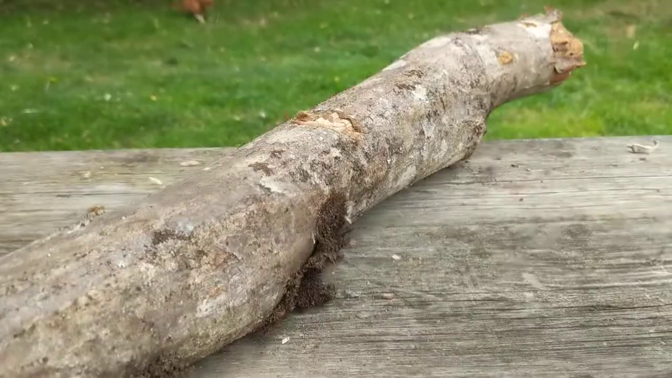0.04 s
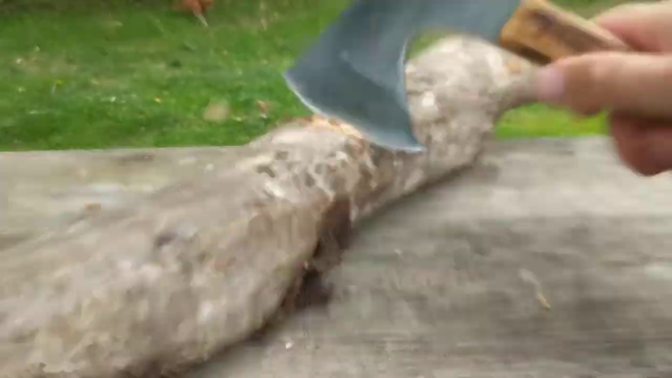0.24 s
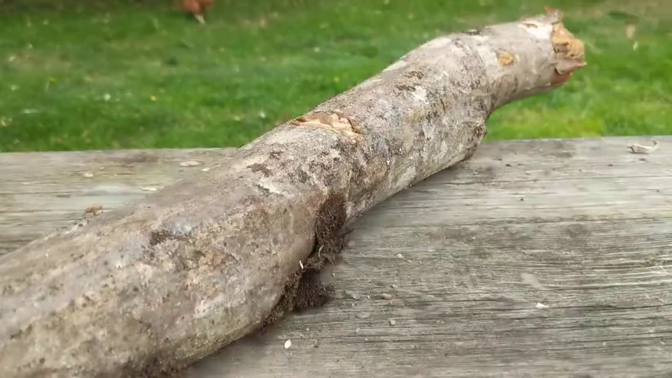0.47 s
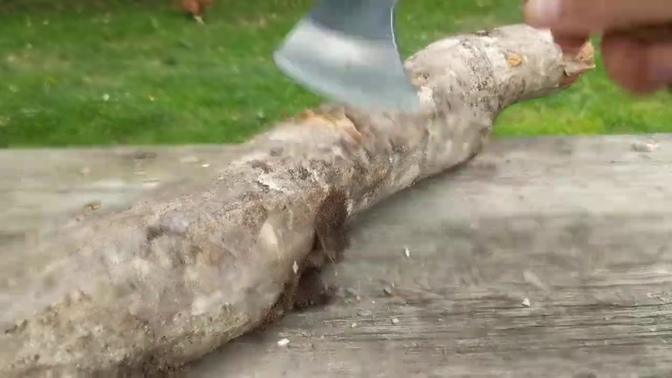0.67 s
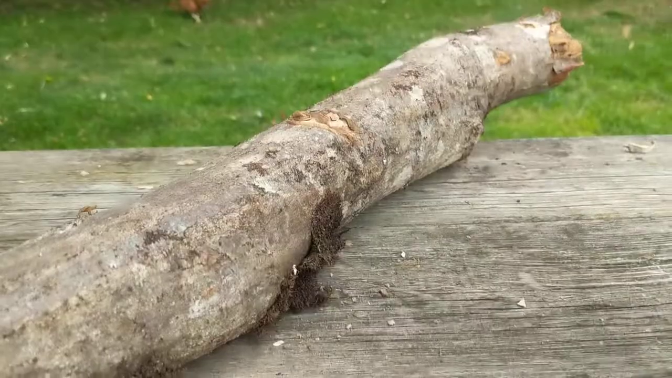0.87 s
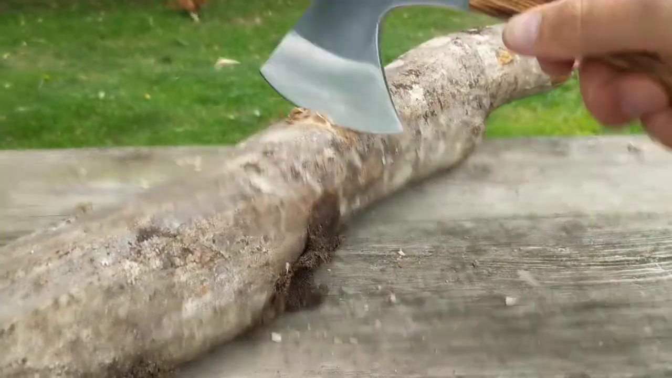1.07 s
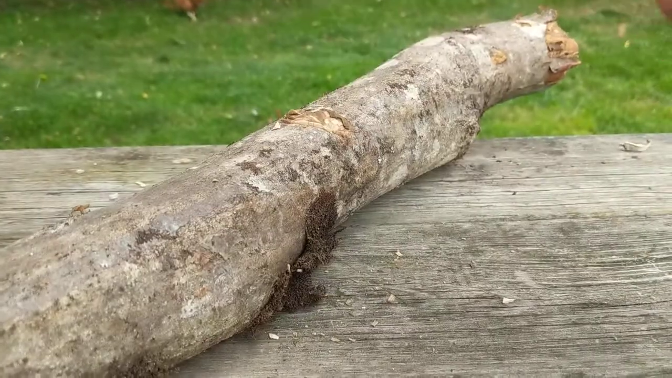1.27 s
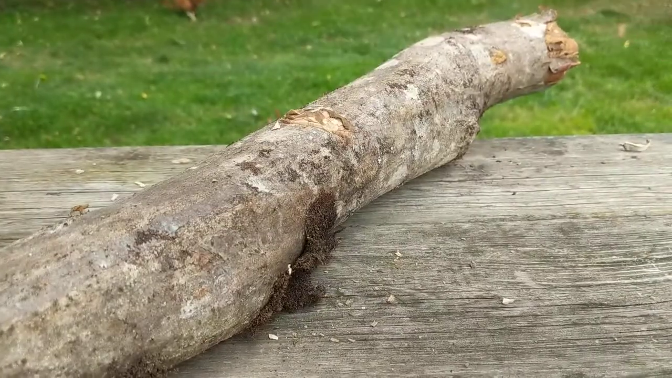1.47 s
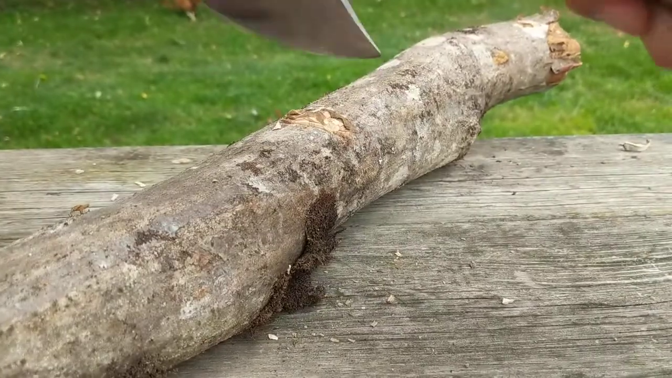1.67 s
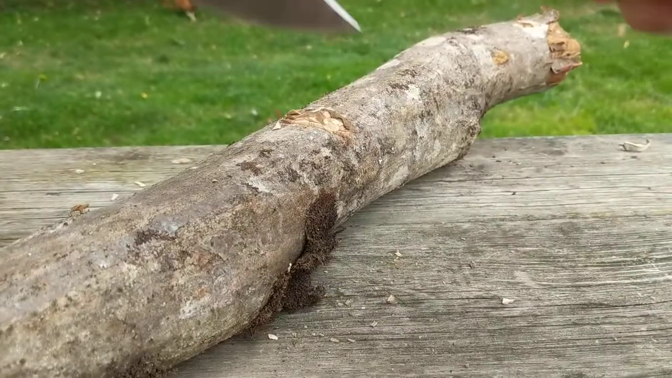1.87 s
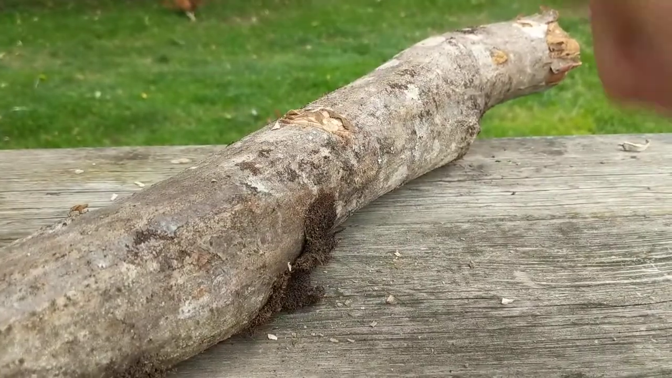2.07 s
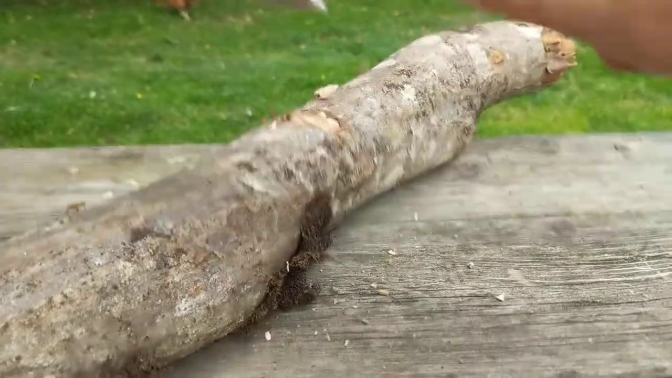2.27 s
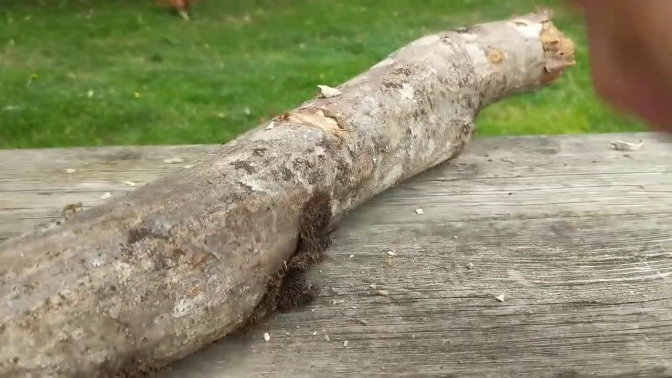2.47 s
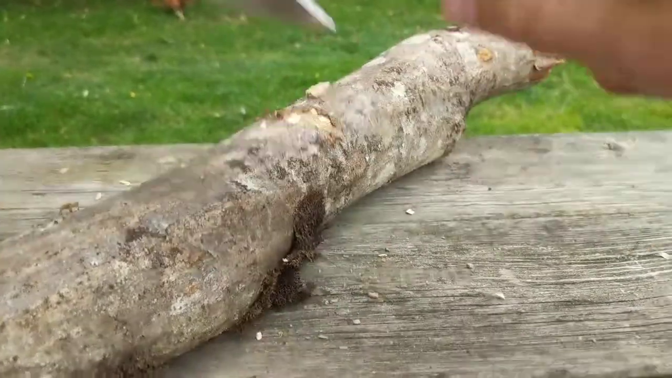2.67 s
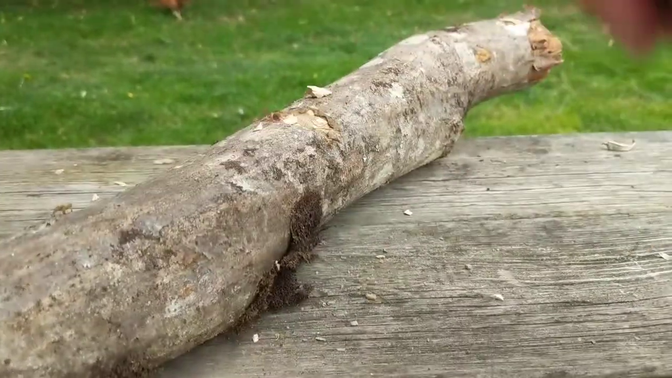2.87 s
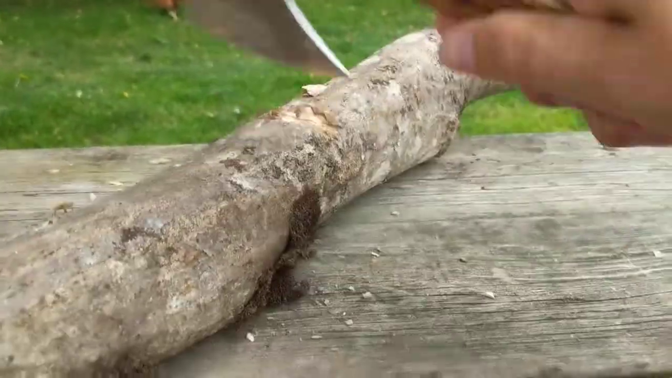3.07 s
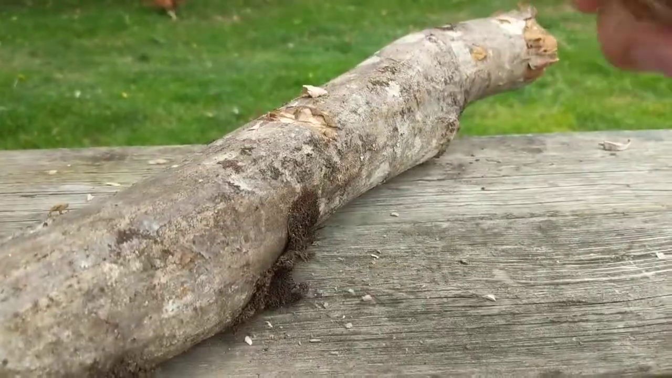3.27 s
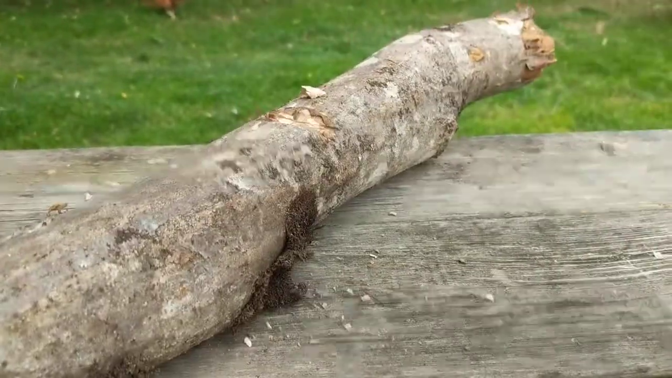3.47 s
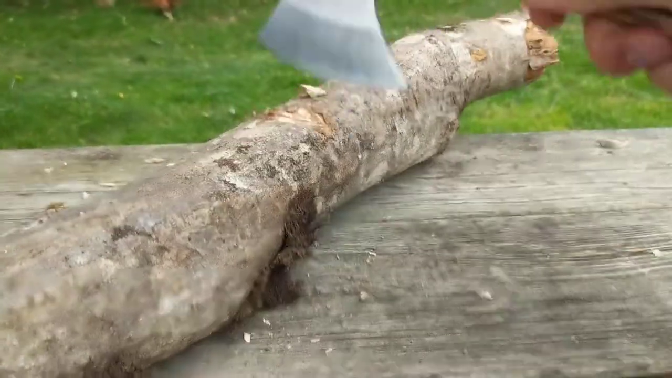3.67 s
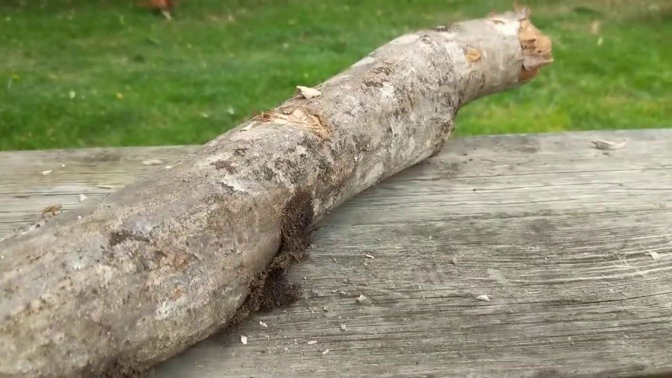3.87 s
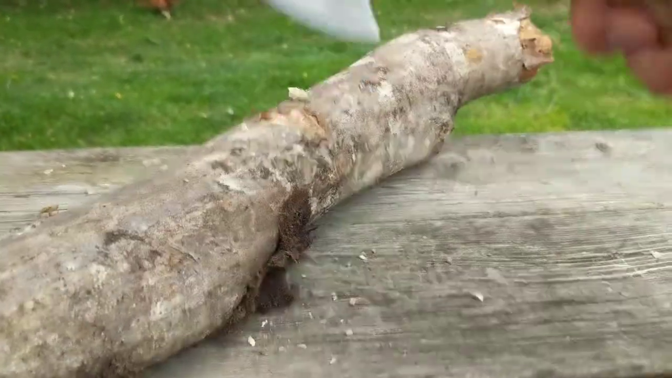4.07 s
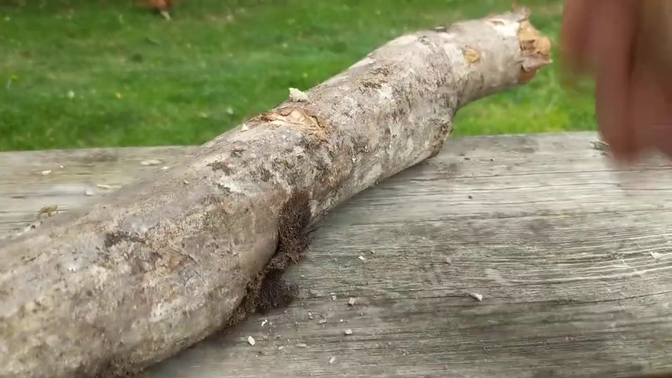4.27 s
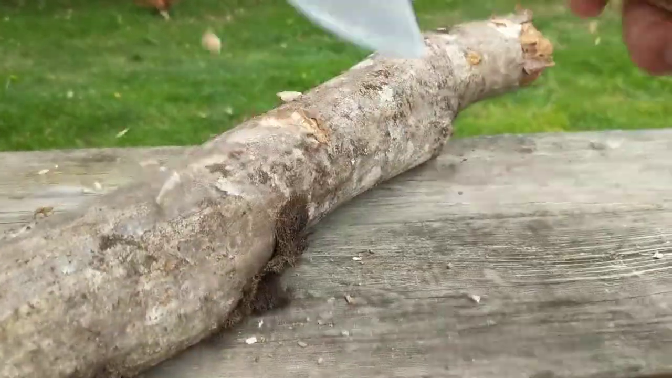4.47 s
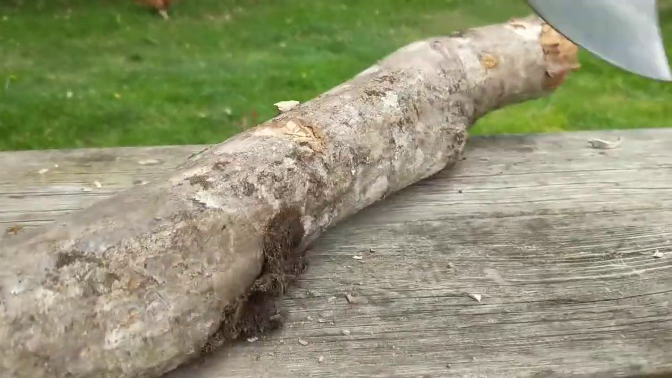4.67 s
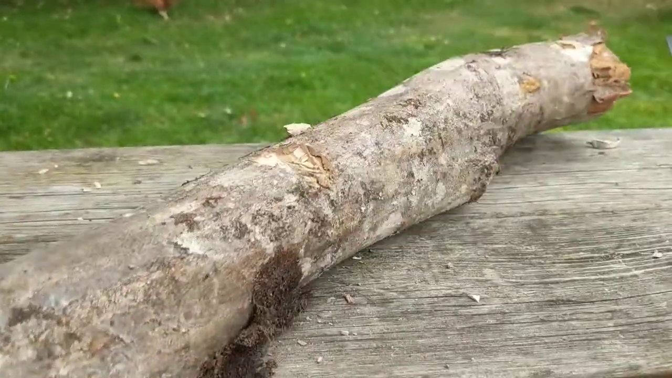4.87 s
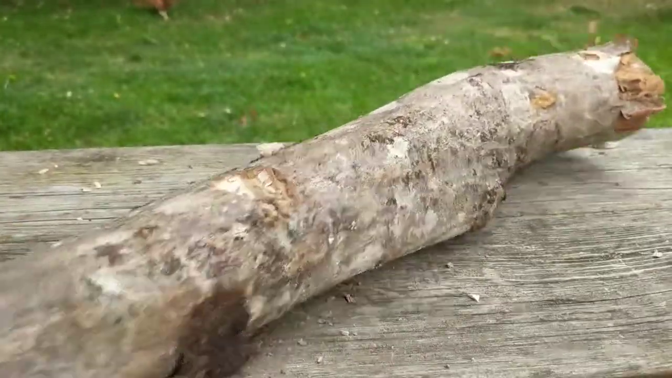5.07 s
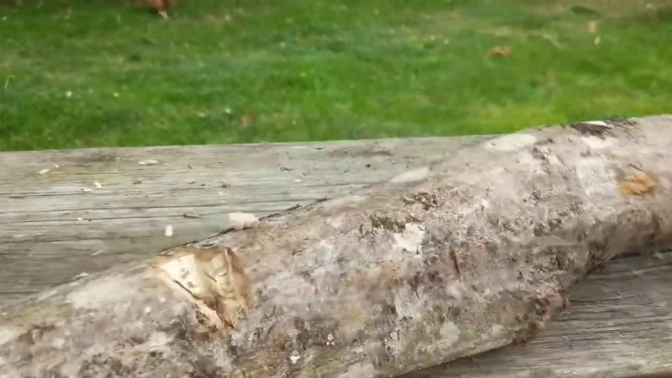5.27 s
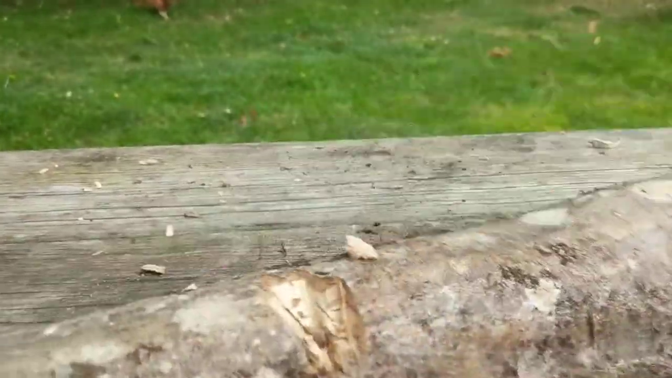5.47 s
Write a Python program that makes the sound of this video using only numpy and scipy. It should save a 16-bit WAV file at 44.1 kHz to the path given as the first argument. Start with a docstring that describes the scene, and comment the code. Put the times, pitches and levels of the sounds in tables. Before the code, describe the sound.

Close by in a quiet yard, a hatchet strikes a dry branch on a bench: three quick blows, a pause, three more, a pause, then three more. Each is a sharp woody crack with a short, hollow plank thump, followed by a very faint blade rasp. Tiny chips tick down between blows. At the end, the hand-held microphone picks up low rumble, rubbing and two knocks.

```python
"""On a wooden garden bench a dry branch is chopped with a hatchet, in runs of three or four blows, close by.
Each blow cracks fibres (shaped noise) and excites decaying modes of branch, notch and planks; the blade
then rasps and rings as it leaves the cut. Chips tick down as short noise bursts and soft low bumps sound.
Fingers knock on the hand-held camera and, at the end, rub and rumble on it, over quiet outdoor air."""
import sys
import numpy as np
from scipy import signal
from scipy.fft import rfft, irfft, next_fast_len
from scipy.io import wavfile
from scipy.ndimage import uniform_filter1d, map_coordinates

SR = 44100
rng = np.random.default_rng(int(sys.argv[2]) if len(sys.argv) > 2 else 0)


def pcm_store(signal):
    """Save signal as 16-bit PCM."""
    levels = np.round(np.clip(np.atleast_2d(signal), -1, 1) * 32767)
    wavfile.write(sys.argv[1], SR, levels.astype(np.int16).T)


N = 243873

# Blows, the first already dying away: [t/s, strength level/dB, relative levels of branch ring/dB,
# notch snap/dB and crack/dB, nominal notch f/Hz, time stuck in the cut/s, pull level/dB]
BLOWS = [(-.11, -8.5, 16, 0, 0, 3060, 0.077, -41), (0.2698, -8.5, 2.5, 1, -3.5, 3050, 0.063, -45),
         (0.6504, -8.5, 3.5, 5, 2, 4410, 0.067, -43.5), (1.0315, -9.5, 7, 0.5, -1.5, 4900, 0.059, -44.5),
         (2.1862, -10, 2.5, 0, -1, 5300, .067, -43.5), (2.5917, -10, 1, 2.5, 1.5, 3090, .062, -47.5),
         (3.0067, -10, -1.5, -2, 0, 3040, 0.06, -48), (3.6485, -8.5, -5, -4.5, 2, 2050, 0.057, -42.5),
         (4.024, -9, -4, -8, 3, 4246, 0.071, -43.5), (4.3755, -8.5, 1.5, -1.5, -3.5, 3070, 0.076, -43.5)]
# Modes of the branch on the bench planks: [nominal f/Hz, relative level/dB, free t60/s]
BENCH_MODES = [(53.45, -24, 0.36), (62.8, -21.5, 0.37), (91, -31, 0.56), (116.4, -24.5, 0.33),
               (120, -32.5, 0.12), (160.3, -13.5, 0.077), (171, -27, 0.29), (206.2, -19.5, 0.16),
               (233, -16, 0.11), (269.5, -22.5, 0.165), (309.6, -26, 0.2), (461.3, -23, 0.154),
               (519, -10.5, 0.049), (588.1, -17, 0.11), (663, -23.5, 0.101), (765, -13, 0.077),
               (799, -25, 0.104), (860, -12.5, 0.036), (935, -43, 0.2), (996.3, -11.5, 0.039),
               (1122, -35, 0.12)]
# Heavily damped bending of the branch under the blade: [nominal f/Hz, relative level/dB, free t60/s]
FLEX_MODES = [(116.4, -10, 0.079), (316.1, -4, 0.014), (937, -12, 0.06)]
# Spectrum of the many small modes of bark and grain: [f/Hz, relative level/dB]
GRAIN_SPECTRUM = [(200, -10.5), (350, 1.5), (600, -0.5), (1000, 0.5), (1800, -2), (2600, -14),
                  (5000, -23.5), (9000, -24.5), (12000, -51)]


def amp(db):
    """The level law: amplitude ratio = 10^(dB/20)."""
    return np.exp(np.asarray(db) * (np.log(10) / 20))


def unit(x, size=None):
    """Normalisation to an rms of 1 over the first size samples, or over all."""
    return x / np.sqrt(np.mean(x[:size] ** 2) + 1e-20)


def along(points, hz):
    """Linear interpolation of (f, value) points on a logarithmic frequency axis."""
    point_hz, value = np.transpose(points)
    return np.interp(np.log(hz + 1), np.log(point_hz), value)


def add(track, s, sound):
    """Superposition: the sound is summed into the track from time s, in seconds."""
    start = round(s * SR)
    sound, start = sound[max(-start, 0):], max(start, 0)
    track[start:start + len(sound)] += sound[:len(track) - start]


def wobble(rate):
    """A band-limited random process: a spline through random knots, rate knots a second."""
    knots = rng.standard_normal(int(N * rate / SR) + 4)
    return map_coordinates(knots, [np.arange(N) * rate / SR])


def colour(x, spectrum):
    """Minimum-phase filtering: a folded cepstrum gives a causal response with the (f, dB) gain."""
    size = 2 * next_fast_len(len(x) // 2 + 2048)
    gain = amp(along(spectrum, np.fft.rfftfreq(size, 1 / SR)))
    cepstrum = irfft(np.log(gain), size)
    # fold the anti-causal half onto the causal half
    cepstrum[1:size // 2] *= 2
    cepstrum[size // 2 + 1:] = 0
    response = np.exp(rfft(cepstrum))
    return irfft(rfft(x, size) * response, size)[:len(x)]


def noise(spectrum):
    """Stationary random noise: white noise shaped to the spectrum, with an rms of 1."""
    return unit(colour(rng.standard_normal(N), spectrum))


def patchy(x, depth_db):
    """Time-varying filtering: a smoothed random gain field over frequency and time shifts the colour."""
    spectrogram = signal.stft(x, nperseg=512)[2]
    field = rng.standard_normal(spectrogram.shape)
    field = uniform_filter1d(field, size=6, axis=0)
    field = uniform_filter1d(field, size=14, axis=1)
    return unit(signal.istft(spectrogram * amp(depth_db * unit(field)), nperseg=512)[1][:N])


def soften(x, hz):
    """Contact compliance: a soft contact acts as a second-order low-pass."""
    return signal.sosfilt(signal.butter(2, min(hz, SR / 3), fs=SR, output="sos"), x)


def ring(modes, t, scatter_db, detune):
    """Modal excitation: one decaying sine a row; each contact draws new strengths and pitches."""
    hz, db, t60 = np.transpose(modes)[:, :, None]
    size, shift = rng.standard_normal((2, len(modes), 1))
    sign = (-1) ** np.arange(len(modes))[:, None]
    decay = amp(db + scatter_db * size - 60 * t / t60)
    return sign * decay * np.sin(2 * np.pi * hz * (1 + detune * shift) * t)


def splinter(t, cut_s, tail_db, tail_t60):
    """Fracture noise: fibres snap densely while the edge goes in, then ever more faintly."""
    bite = np.exp(-(2 * t / max(cut_s, 1e-4) - 1) ** 4)
    tail = amp(tail_db - 60 * t / tail_t60)
    return rng.standard_normal(len(t)) * (bite + tail)


def plank_thump(t, ring_db):
    """Forced modal response: the stopped head drives planks, frame and branch bending."""
    # Modes of the bench's frame, shaken through the planks: [nominal f/Hz, relative level/dB, free t60/s]
    frame_modes = [(362, -28, 0.15), (411, -27.5, 0.11)]
    # How hard a blow drives the planks: [f/Hz, relative level/dB]
    drive_spectrum = [(60, -2), (150, -1.5), (250, -.5), (400, -1.5), (600, 0.5), (950, 0)]
    # A blow beside the support rings the branch more and shifts the thump: [f/Hz, dB per dB of ring]
    thump_per_ring = [(100, -.1), (220, -.2), (400, -.45), (560, -.25), (800, .2)]

    mode_hz = np.vstack([BENCH_MODES, FLEX_MODES, frame_modes])[:, :1]
    drive = amp(along(drive_spectrum, mode_hz) + ring_db * along(thump_per_ring, mode_hz))
    modes = np.vstack([ring(BENCH_MODES, t, scatter_db=2.0, detune=0.0071),
                       ring(FLEX_MODES, t, scatter_db=2.5, detune=0.031),
                       ring(frame_modes, t, scatter_db=1.5, detune=0.024)])
    # the wedged blade damps the higher modes of the wood
    modes = modes * amp(-55 * t * mode_hz / mode_hz.max())
    return amp(8.5) * soften((drive * modes).sum(0), hz=2090)


def branch_ring(t, ring_db):
    """Free vibration of the branch: a few short modes over a dense, noise-like rattle."""
    # The branch's own short resonances: [nominal f/Hz, relative level/dB, t60/s]
    branch_modes = [(1317.6, -7, 0.024), (1577, -1.5, 0.026), (1782, -.5, 0.034), (2060, -6, .018)]

    branch = unit(ring(branch_modes, t, scatter_db=4.0, detune=0.012).sum(0), size=1024)
    # countless small modes of bark and grain blur into a short rattle
    rattle = rng.standard_normal(len(t)) * amp(-60 * t / 0.075)
    rattle = unit(colour(rattle, GRAIN_SPECTRUM), size=1024)
    return amp(ring_db - 21.5) * branch + amp(ring_db - 19.5) * rattle


def notch_snap(t, snap_db, notch_hz):
    """Local resonance: the wood around the cut rings briefly, one pitch shifting from blow to blow."""
    # The wood around the cut: [nominal f/Hz, relative level/dB, t60/s]
    notch_modes = [(2580, -8.5, 0.0078), (3055, 2, 0.013), (3990, -11, 0.015), (4690, -8, 0.022),
                   (5240, -10.5, 0.016)]

    # the notch pitch of this blow joins the fixed modes
    modes = list(notch_modes) + [(notch_hz, -3, .016)]
    snap = ring(modes, t, scatter_db=1.5, detune=0.0098).sum(0)
    return amp(snap_db - 19.5) * unit(snap, size=1024)


def chops():
    """Impact: the edge cracks into the wood; the stopped head then drives branch and planks."""
    # Spectrum of the snapping fibres: [f/Hz, relative level/dB]
    crack_spectrum = [(1000, -5), (2500, -1.5), (5500, -4.5), (6600, -1.5), (7700, 0), (9200, -1),
                      (10200, -10.5), (11500, -21.5), (16000, -22)]

    out, t = np.zeros(N), np.arange(SR // 2) / SR
    for s, db, ring_db, snap_db, crack_db, notch_hz, *_ in BLOWS:
        # time in s for the edge to go in: a louder crack is a quicker cut
        cut_s = .0021 * np.exp(-.07 * crack_db)
        fibres = splinter(t, cut_s, tail_db=-12.5, tail_t60=0.035)
        crack = amp(crack_db - 21) * unit(colour(fibres, crack_spectrum), size=1024)
        # bark crumbles just before the edge meets hard wood
        bark = colour(splinter(t, cut_s, tail_db=-20.5, tail_t60=.01), GRAIN_SPECTRUM)
        wood = plank_thump(t, ring_db) + branch_ring(t, ring_db) + notch_snap(t, snap_db, notch_hz)
        add(out, s - .002, amp(db - 23) * bark)
        add(out, s + .0003, amp(db) * crack)
        add(out, s + .0009, amp(db) * wood)
    return out


def drag(length):
    """Friction: unevenly slipping noise along the cut, with the modes of the steel head."""
    # The steel head: [nominal f/Hz, relative level/dB, t60/s]
    steel_modes = [(2720, -7, .15), (3870, -8, .22), (4450, -6, .28), (4720, -7, .2), (5850, -5, .28),
                   (7450, -4, .28), (7870, -7, .22), (8330, 0, .22), (9250, -7, .2)]
    # Spectrum of the rasp: [f/Hz, relative level/dB]
    rasp_spectrum = [(200, 6.5), (900, 7.5), (1800, 1.5), (2500, 0), (4700, -0.5), (6800, -4), (8700, 1.5),
                     (9600, -10.5), (11000, -18), (16000, -26)]

    t = np.arange(SR // 5) / SR
    stroke = (1 - np.exp(-t / .0015)) * np.exp(-(t / max(length, 1e-3)) ** 2)
    slips = amp(5.8 * unit(uniform_filter1d(rng.standard_normal(len(t)), size=200)))
    rasp = unit(colour(rng.standard_normal(len(t)) * stroke * slips, rasp_spectrum), size=2048)
    head = ring(steel_modes, t, scatter_db=3.5, detune=.0008).sum(0)
    steel = unit(head * (1 - np.exp(-t / 0.002)), size=2048)
    return amp(-12.8) * rasp + amp(-22) * steel


def creak():
    """Intermittent fracture: fibres give way in uneven jerks as the blade prises the cut open."""
    t = np.arange(SR // 5) / SR
    jerks = amp(7.3 * unit(uniform_filter1d(rng.standard_normal(len(t)), size=150)))
    stroke = (1 - np.exp(-t / 0.0013)) * np.exp(-(t / .045) ** 2)
    return unit(colour(rng.standard_normal(len(t)) * jerks * stroke, GRAIN_SPECTRUM), size=2048)


def blade():
    """Sliding friction: after every blow the blade wedges in, sticks, is levered loose and slides out."""
    # delay after the blow, length of the stroke, level next to the blow
    wedge_after_s, wedge_s, wedge_db = .014, .055, -37.5
    # the blade comes free in two drags; the slide is delayed from the levering
    lever_s, slide_after_s, slide_s = 0.037, .04, 0.044
    creak_db = -10.5  # next to the pull
    out = np.zeros(N)
    for blow, (s, db, *_, stuck_s, pull_db) in enumerate(BLOWS):
        add(out, s + wedge_after_s, amp(db + wedge_db) * drag(wedge_s))
        levering = drag(lever_s) + amp(creak_db) * creak()
        add(out, s + stuck_s, amp(pull_db) * levering)
        # the slide, next to the levering, grows by 1 dB a blow as the cut deepens
        slide_db = pull_db - 8.5 + blow
        add(out, s + stuck_s + slide_after_s, amp(slide_db) * drag(slide_s))
    return out


def ticks(rows):
    """Light impact: noise bursts, bright tick plus duller body, for rows of (s, level dB, body dB)."""
    # Spectrum of the bright part: [f/Hz, relative level/dB]
    tick_spectrum = [(1000, -25.5), (5000, -8), (7000, -3.5), (8700, 3), (10000, -18), (12000, -23),
                     (16000, -30)]

    out, t = np.zeros(N), np.arange(SR // 16) / SR
    for s, db, body_db in rows:
        tick, body = rng.standard_normal((2, len(t))) * amp(-60 * t / 0.034)
        tick = unit(colour(tick, tick_spectrum), size=256)
        body = unit(soften(body, hz=3674), size=256)
        add(out, s + 0.0011, amp(db - 16.0) * (tick + amp(body_db) * body))
    return out


def chips():
    """Delayed light impacts: large flakes of bark land, and a crumb falls after every blow's flight time."""
    # The larger chips landing: [t/s, nominal tick level/dB, body level next to the tick/dB]
    large_chips = [(0.847, -47.5, -24.5), (1.267, -54, -4), (1.3598, -41.5, -20), (1.5379, -48.5, -20),
                   (1.723, -50.5, -6.5), (2.5232, -52.5, 7.5)]

    crumbs = []
    for s, *_ in BLOWS:
        flight_s = rng.uniform(.19, .3)
        crumbs.append((s + flight_s, -60 + 5.5 * rng.standard_normal(), 2))
    return ticks(list(large_chips) + crumbs)


def bumps():
    """Soft impact: the holding hand shifts, or the branch drops back after a pull, and the planks sound."""
    # Soft low bumps, most just before a blow, as the downswing shifts the holding hand:
    # [t/s, peak level/dB, contact softness f/Hz]
    hand_shifts = [(2.486, -44, 340), (2.898, -48.5, 254), (3.371, -40.5, 230), (3.539, -47, 297),
                   (4.316, -51, 300)]

    out, t = np.zeros(N), np.arange(SR // 4) / SR
    # the branch, lifted by the blade, drops back about 66 ms after the levering
    settling = [(s + stuck_s + .066 + .014 * rng.standard_normal(), -44, 380)
                for s, *_, stuck_s, _ in BLOWS]
    for s, db, soft_hz in list(hand_shifts) + settling:
        modes = np.vstack([ring(BENCH_MODES, t, scatter_db=3.5, detune=0.019),
                           ring(FLEX_MODES, t, scatter_db=1.5, detune=0.033)])
        bump = soften(modes.sum(0), soft_hz)
        add(out, s, amp(db) * bump / np.abs(bump).max())
    return out


def taps():
    """Damped shell modes: fingers knock on the camera's case and damp its ringing."""
    # Knocks: [t/s, peak level/dB, contact softness f/Hz, added finger damping t60/s]
    knocks = [(0.19, -43, 2500, 0.021), (5.322, -26, 420, 0.43), (5.389, -21, 2400, .4)]
    # The case: [nominal f/Hz, relative level/dB, t60 without the finger/s]
    case_modes = [(142, 5.5, .08), (318, -3.5, 0.11), (446, -1, 0.16), (526, -3, 0.1), (725, -6.5, 0.085),
                  (926, -3, 0.087), (1085, -8, 0.07), (1660, -10.5, 0.062), (2430, -18, .05)]

    out, t = np.zeros(N), np.arange(SR // 4) / SR
    for s, db, soft_hz, t60 in knocks:
        contact = rng.standard_normal(len(t)) * amp(-2.5 - 60 * t / 0.077)
        case = ring(case_modes, t, scatter_db=4.5, detune=0.0093).sum(0)
        tap = soften((case + contact) * amp(-60 * t / t60), soft_hz)
        add(out, s, amp(db) * tap / np.abs(tap).max())
    return out


def handling():
    """Modulated friction noise: fingers shift on the camera, a lumpy rumble under rubbing skin."""
    # The hand on the camera: [t/s, relative rumble level/dB, relative sliding hiss level/dB]
    hand_levels = [(4.6, -56, -68.5), (4.658, -59.5, -85), (4.7, -45, -62), (4.754, -35, -60.5),
                   (4.864, -45, -57), (5.014, -50.5, -68.5), (5.15, -31.5, -64.5), (5.314, -29.5, -59),
                   (5.36, -32, -63), (5.53, -42, -61.5)]
    # Spectrum of the finger pressure: [f/Hz, relative level/dB]
    rumble_spectrum = [(25, -33.5), (45, -7), (65, 1), (110, -1.5), (170, -9.5), (280, -16.5), (400, -26.5),
                       (900, -63), (3000, -88.5)]
    # Spectrum of the rubbing skin: [f/Hz, relative level/dB]
    rub_spectrum = [(250, -12), (400, 8.5), (540, 17.5), (680, 5), (1000, 2.5), (1500, 0), (3000, -3.5),
                    (6000, -7.5), (7500, -15), (11000, -34.5)]
    # Spectrum of the sliding hiss: [f/Hz, relative level/dB]
    hiss_spectrum = [(5000, -20.5), (7300, -7), (8400, 0), (9200, -4), (10200, -13.5), (11500, -23.5),
                     (16000, -32)]
    # The grip slips with a small click: [t/s, nominal tick level/dB, body level next to the tick/dB]
    grip_clicks = [(0.191, -47.5, 4), (4.6922, -41.5, 5), (4.9482, -39, -15)]

    t = np.arange(N) / SR
    s, *levels = np.transpose(hand_levels)
    rumble_db, hiss_db = [np.interp(t, s, db, left=-120) for db in levels]
    # rubbing grows with both the pressure (rumble) and the sliding (hiss)
    pressure_share = .22
    rub_db = 2.5 + pressure_share * rumble_db + (1 - pressure_share) * hiss_db
    # the pressure of the fingers comes in lumps, from 45 random knots a second
    rumble = unit(amp(1.5 * wobble(45)) * noise(rumble_spectrum))
    grip = unit(amp(1.2 * wobble(50) + 3 * wobble(700)))
    skin = patchy(noise(rub_spectrum), depth_db=2.5)
    hiss = patchy(noise(hiss_spectrum), depth_db=1.5)
    sliding = grip * (amp(rub_db) * skin + amp(hiss_db + 0.55) * hiss)
    return amp(rumble_db + 0.2) * rumble + sliding + ticks(grip_clicks)


def yard(x):
    """Diffuse reverberation: convolution with a noise tail whose decay depends on frequency."""
    # The yard's decay: [f/Hz, t60/s]
    yard_decay = [(60, 0.4458), (130, 0.85), (300, 0.2255), (1000, 0.445), (3000, 0.38), (9000, 0.0028)]
    # The yard's colour: [f/Hz, relative level/dB]
    yard_spectrum = [(60, 4.5), (130, -1.5), (300, -3.5), (1000, -4), (3000, -7), (9000, 8)]

    hz, t, z = signal.stft(rng.standard_normal(SR), SR, nperseg=512)
    decay = amp(-60 * t / along(yard_decay, hz)[:, None])
    tail = signal.istft(z * decay, SR, nperseg=512)[1]
    tail = colour(tail / np.linalg.norm(tail), yard_spectrum)
    return signal.fftconvolve(x, tail)[:N]


def air():
    """Broadband ambient noise: faint outdoor air whose level wavers slowly."""
    # Spectrum of the outdoor air: [f/Hz, relative level/dB]
    air_spectrum = [(25, -8), (50, 3.5), (90, 1.5), (200, -13.5), (450, -15.5), (900, -18.5), (2000, -23.5),
                    (4500, -28), (9000, -35), (16000, -38.5)]

    return amp(-64.5 + 0.59 * wobble(4.7)) * noise(air_spectrum)


def scene():
    """Linear superposition of the wood and its faint echo, the blade, the chips, the hand and the air."""
    wood = chops() + bumps()
    echo = amp(-28) * yard(wood)
    return (wood + echo + blade() + chips() + taps() + handling() + air())[None]


def record(dry):
    """Band limiting and saturation: deep bass is shed, tall peaks rounded, the top steeply cut."""
    lean = signal.sosfilt(signal.butter(3, 38, "high", fs=SR, output="sos"), dry)
    ceiling = .74  # amplitude that the rounded peaks approach
    rounded = lean / (1 + np.abs(lean / ceiling) ** 6) ** (1 / 6)
    return signal.sosfilt(signal.butter(16, 16100, fs=SR, output="sos"), rounded)


dry = scene()
out = record(dry)
pcm_store(out)
```